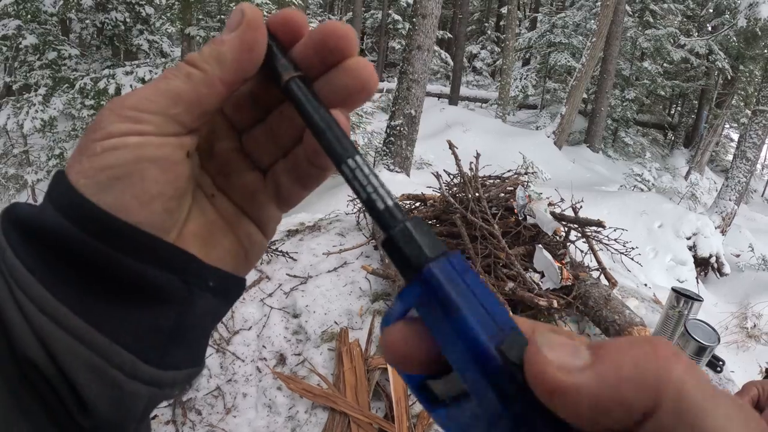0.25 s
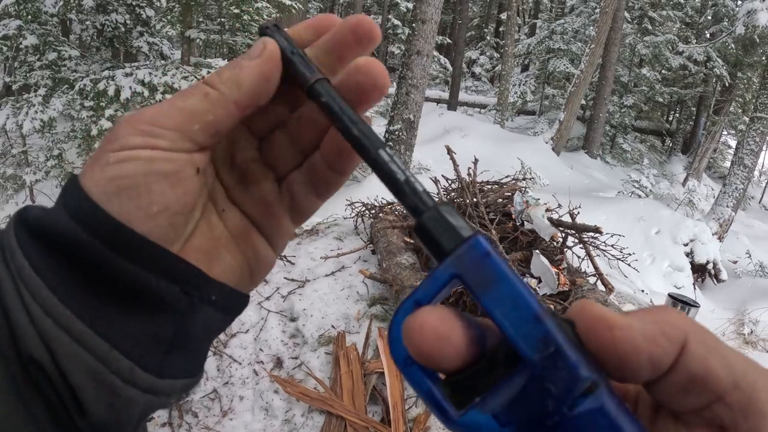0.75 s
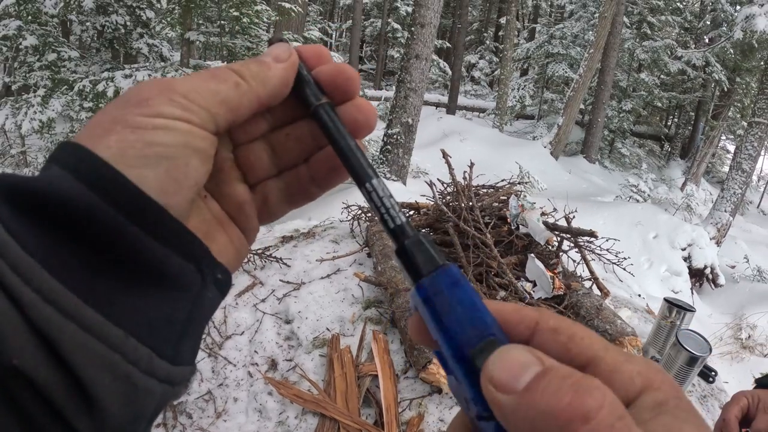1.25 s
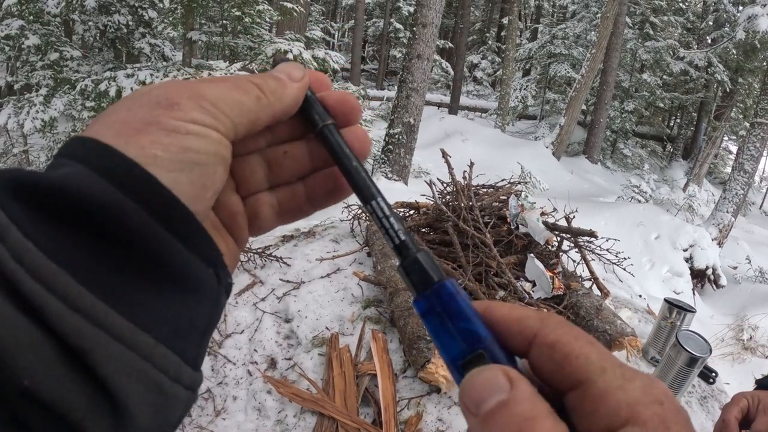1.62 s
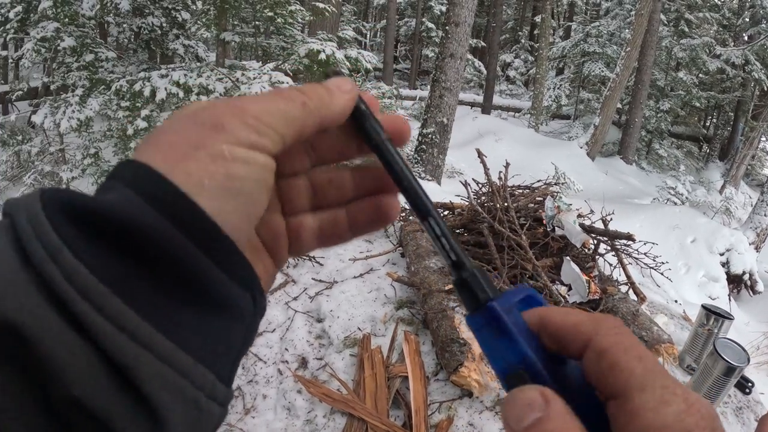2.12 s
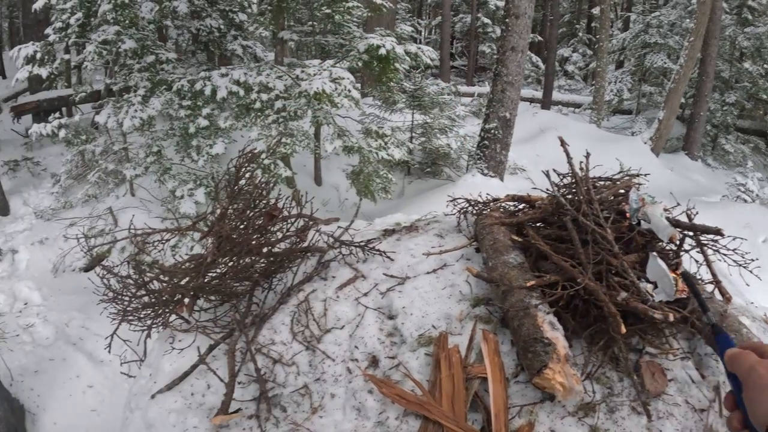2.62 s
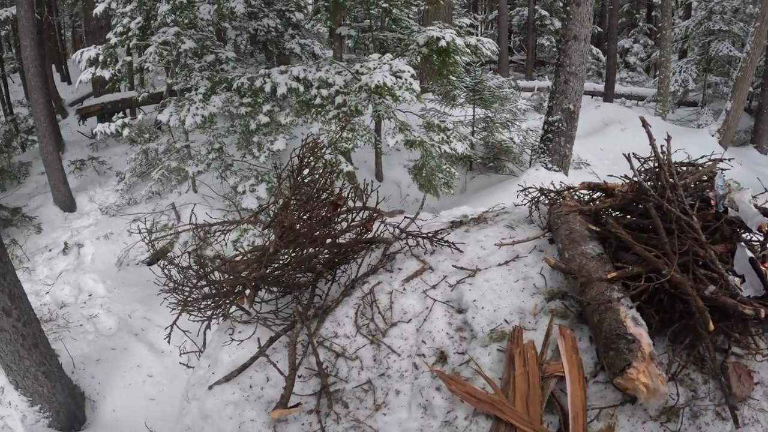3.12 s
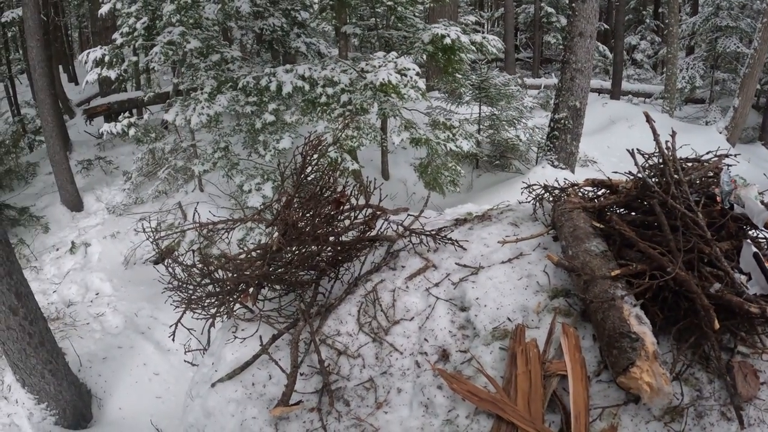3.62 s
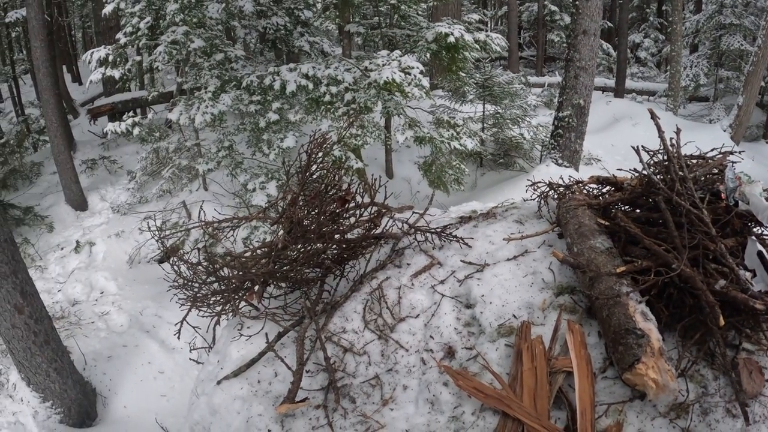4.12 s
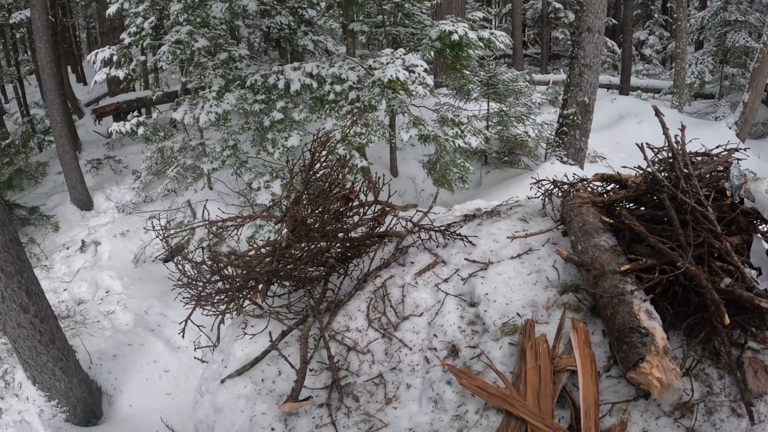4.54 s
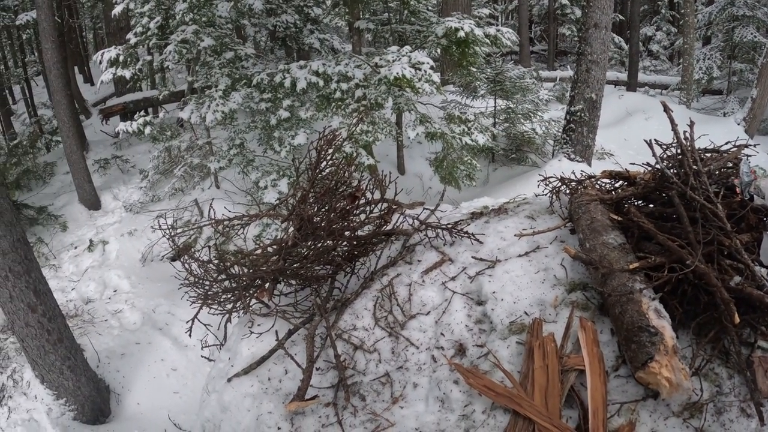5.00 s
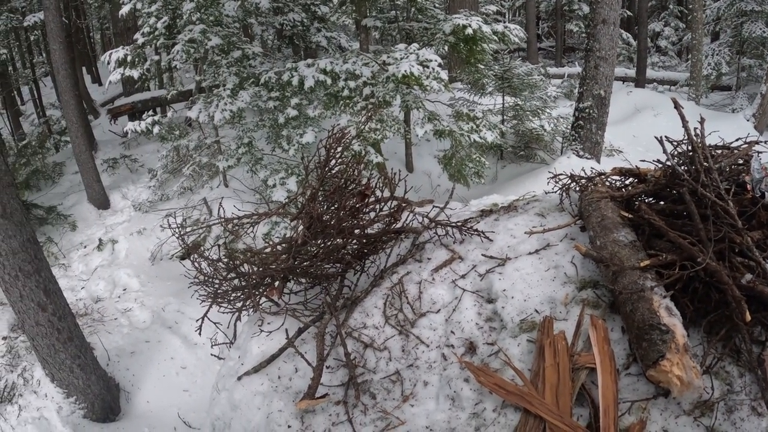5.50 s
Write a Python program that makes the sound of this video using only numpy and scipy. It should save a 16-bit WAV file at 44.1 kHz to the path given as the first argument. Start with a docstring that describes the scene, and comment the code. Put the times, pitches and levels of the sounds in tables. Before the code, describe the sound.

A utility lighter's lever ticks back and forth, cloth swishes as the arm moves, then its trigger is pumped repeatedly with hard igniter snaps.

```python
"""A long-necked plastic gas lighter is worked close to a microphone in a quiet snowy wood.
First its notched flame lever is run to and fro; after the arm has moved, the trigger is pumped:
small catches, then the igniter's hammer snaps and the metal neck rings. Each click is a burst of
noise driven through dying sines. Sleeves rustle and the wood hums faintly as shaped noise."""
import sys
import numpy as np
from scipy import signal
from scipy.fft import rfft, irfft
from scipy.io import wavfile
from scipy.ndimage import uniform_filter1d

SR = 44100
rng = np.random.default_rng(int(sys.argv[2]) if len(sys.argv) > 2 else 0)


def inscribe(sig):
    """Save sig as 16-bit PCM at rate SR to the path in sys.argv[1].

    A 1-D sig is mono; a 2-D sig holds one channel per row.
    Samples are clipped to [-1, 1] before scaling.
    """
    pcm = np.round(np.clip(np.atleast_2d(sig).T, -1, 1) * 32767)
    wavfile.write(sys.argv[1], SR, pcm.astype(np.int16))


N = 254104

# Flame lever jumping its notches. Each row: time in s, peak in dB, favoured low ring in Hz, favoured
# high ring in Hz, high ring level in dB, hardness in dB per octave, slip length in ms, body ring in dB.
NOTCHES = [(0.022, -7, 2080, 2670, -21.5, -5, 1.54, -8.5), (0.07, -15, 2020, 3540, 0, -15, 1.85, -8),
           (0.092, -21, 1870, 3230, -11.5, -24, 0.5, -12),
           (0.242, -4.5, 1920, 3300, 0.5, -10.5, 2.24, -8.5), (0.268, -3, 2020, 3350, 1.1, -16, 1.44, -6.5),
           (0.291, -6, 2000, 3645, -6.2, -11, 2, -6.5), (0.316, -3.5, 1980, 3260, -3.5, -12, 1.19, -10.5),
           (0.354, -3.5, 1950, 3320, -5, -12, 1.73, -7.5), (1.01, 2, 2090, 2900, 5.5, -6, 1.5, -9.5),
           (1.053, -3, 2030, 3050, 4, -9, 1.96, -8), (1.073, -18.5, 2390, 2990, -0.5, 0, 1.4, -37),
           (1.115, 0.5, 1830, 2580, 5, -3, 1.16, -8.5), (1.268, -1.5, 2240, 2810, -1.5, -6.5, 2.05, -11.5),
           (1.493, -2.5, 2250, 2750, 12.5, -1, 1.45, -4), (1.524, -4.5, 2170, 3550, -11, -0.5, 1.13, 1.7),
           (1.59, -3, 2230, 3570, 2, 4, 1.34, -0.5), (1.888, -1, 2060, 3390, 4.5, 3, 1.37, 1),
           (1.923, -0.5, 2220, 2600, 0.5, 8.5, 1.54, 0)]
# Trigger catching on its way to the snap. Each row: time in s, peak in dB, favoured low ring in Hz,
# favoured high ring in Hz, high ring level in dB, hardness in dB per octave.
CATCHES = [(3.295, -2.5, 2600, 3650, 16.5, 10.5), (3.325, -4.5, 1580, 3830, 10, 7),
           (3.518, -26.5, 1920, 4820, -9, -12), (3.523, -13, 1880, 4570, 6, 3),
           (3.809, -15.5, 2320, 3300, 2, 4), (3.812, -10.5, 1630, 2770, -3, 6.5),
           (3.87, -6.5, 2600, 3900, 0.5, 2), (4.155, -10.5, 1620, 2920, .1, 0),
           (4.196, -16, 2450, 2560, 4, -3.5), (4.202, -17.5, 1520, 3220, -6, -11),
           (4.475, -13, 1480, 2750, -4, -0.2), (4.519, -22, 1570, 3500, -12, -12.5),
           (4.71, -11.5, 1930, 4200, -4, 7), (4.759, -18, 1570, 2480, -14, -18.5),
           (4.954, -22.5, 1540, 2740, -7, -13.5)]
# Igniter hammer. Each row: time in s, crack peak in dB, hardness in dB per octave,
# neck ring gain in dB relative to the snap.
SNAPS = [(3.556, 2.6, 14.5, -24), (3.908, 0.2, 9.5, -22), (4.237, -1.1, 9, -19), (4.556, 0.2, 11.5, -16.5),
         (4.799, 0.06, 11.5, -15), (5.016, 0.5, 12, -14)]


def gain_of(db):
    """Amplitude factor of a level in dB."""
    return 10 ** (np.asarray(db) / 20)


def evened(x):
    """Scaled to unit RMS."""
    return x / np.sqrt(np.mean(x ** 2) + 1e-20)


def peaked(x):
    """Scaled to unit peak."""
    return x / (abs(x).max() + 1e-12)


def read(points, hz):
    """A curve of (Hz, value) points read on a log frequency axis."""
    f, value = np.transpose(points)
    return np.interp(np.log(hz + 1), np.log(f + 1), value)


def add(mix, s, sound):
    """Adds a sound into the mix at s seconds, cut at the end."""
    part = mix[round(s * SR):][:len(sound)]
    part += sound[:len(part)]


def ring(modes, tilt_db, size):
    """Dying sines; a harder blow, with more tilt in dB per octave, favours the high ones."""
    hz, db, t60 = np.transpose(modes)[:, :, None]
    t = np.arange(size) / SR
    level_db = db + tilt_db * np.log2(hz / 2000) - 60 * t / t60
    return (gain_of(level_db) * np.sin(2 * np.pi * hz * t)).sum(0)


def causal(points, size):
    """Minimum-phase filter with the given gain: it answers only after the blow."""
    log_gain = read(points, abs(np.fft.fftfreq(size, 1 / SR))) * np.log(10) / 20
    spectrum = np.exp(np.conj(signal.hilbert(log_gain)))
    return np.fft.ifft(spectrum).real[:size // 2]


def noise(points, patchy_db, flicker_db, size):
    """Random short-time spectra with drifting patches and flicker shared by all bands."""
    hop = size // 4
    frames, hz = N // hop + 5, np.fft.rfftfreq(size, 1 / SR)
    a, b, patches = rng.standard_normal((frames, len(hz), 3)).T
    patches = uniform_filter1d(patches, size=6, axis=0)
    patches = evened(uniform_filter1d(patches, size=10, axis=1))
    flicker = evened(uniform_filter1d(rng.standard_normal(frames), size=4))
    level_db = read(points, hz)[:, None] + patchy_db * patches + flicker_db * flicker
    z = (a + 1j * b) * gain_of(level_db)
    return evened(signal.istft(z, nperseg=size, noverlap=size - hop)[1][:N])


def slip(length_ms, grit, tail_db):
    """A tooth lets go in a short noise burst; hands and snow return a weak smear."""
    ms = np.arange(len(grit)) / SR * 1000
    u = ms / np.clip(length_ms, .2, 6)
    smear = gain_of(tail_db - 1.6 * ms) * (1 - np.exp(-u ** 2)) * np.sqrt(1 - ms / ms[-1])
    shape = u ** 2 * np.exp(1 - u ** 1.56) + smear
    # even out the noise burst's spectrum so its colour stays steady, then restore its shape
    z = rfft(grit * shape)
    even = irfft(z / uniform_filter1d(abs(z), size=5), len(grit))
    return even / np.sqrt(uniform_filter1d(even ** 2, size=31) + 1e-12) * shape


def band(x, lo_hz, hi_hz):
    """Third-order Butterworth band-pass, run forward in time."""
    sos = signal.butter(3, [lo_hz, hi_hz], "bandpass", fs=SR, output="sos")
    return signal.sosfilt(sos, x)


def stillness():
    """The quiet wood: faint steady noise with a shaped spectrum."""
    # Each row: frequency in Hz, relative density in dB per Hz.
    still_spectrum = [(12, -70.5), (20, -46.5), (94, -66.5), (135, -11), (270, -4), (310, -3), (421, -13),
                      (457, -13.5), (603, 2), (865, -21), (1110, -10), (1210, -3.5), (15000, -55)]
    level_db = -61.5
    return gain_of(level_db) * noise(still_spectrum, patchy_db=1.1, flicker_db=0.8, size=1024)


def click_swell():
    """Soft rounded swell of background noise around each louder click; overlaps add as power."""
    rise_s, fall_s = 0.059, 0.12
    t = np.arange(0, N, 64) / SR
    s, db = np.transpose([row[:2] for row in NOTCHES + CATCHES + SNAPS])[:, :, None]
    width_s = np.where(t < s, rise_s, fall_s)
    bumps = gain_of(db / 2) * np.exp(-((t - s) / width_s) ** 2)
    total = np.sqrt((bumps ** 2).sum(0))
    return np.interp(np.arange(N) / SR, t, total)


def rustle():
    """Cloth swishes in the treble and rumbles in the bass; moved air pushes on the microphone."""
    # Arm and sleeve movement. Each row: time in s, swish level in dB, rumble level in dB.
    moving = [(0.0, -48.5, -50.5), (0.43, -46.5, -47.5), (0.56, -52, -55), (0.82, -57, -57.5),
              (1.14, -51.5, -51), (1.38, -80, -64), (1.62, -63, -55.5), (1.771, -66, -58),
              (2.05, -67, -60.5), (2.21, -44.5, -51), (2.34, -44, -43), (2.42, -45, -42.5),
              (2.68, -43.5, -41), (3.07, -47.5, -44.5), (3.31, -61.5, -52), (3.75, -64, -66),
              (4.45, -66, -63), (4.9, -57.5, -65), (5.22, -66.5, -57), (5.441, -69.5, -59),
              (5.6, -56.5, -57.5), (5.76, -39, -48.5)]
    # Spectra of swish, rumble and moved air. Each row: frequency in Hz, relative density in dB per Hz.
    swish_spectrum = [(350, -31), (600, -2.5), (815, -8), (895, -28), (1120, 1), (1610, -1.5), (1940, 1.5),
                      (2240, 0.5), (4370, -4), (7060, -12.5), (9340, -29), (11600, -18.5), (14500, -54.5)]
    rumble_spectrum = [(65, -44.5), (110, -22.5), (150, 1), (284, 5.5), (446, 7.5), (561, 2), (620, 2),
                       (1200, -4), (1560, -38.5), (2640, -120)]
    deep_spectrum = [(15, -24), (30, -12.5), (65, -3), (95, -7), (130, -40.5), (400, -81.5)]
    swell_treble_db, swell_bass_db, air_under_rumble_db = -51.5, -54.5, -36.5

    t, swell = np.arange(N) / SR, click_swell()
    s, swish_points_db, rumble_points_db = np.transpose(moving)
    swish_db = np.interp(t, s, swish_points_db)
    rumble_db = np.interp(t, s, rumble_points_db)
    # movement and swell add as power
    swish_gain = np.hypot(gain_of(swish_db), gain_of(swell_treble_db) * swell)
    rumble_gain = np.hypot(gain_of(rumble_db), gain_of(swell_bass_db) * swell)
    air_gain = gain_of(rumble_db + air_under_rumble_db)

    rumble = rumble_gain * noise(rumble_spectrum, patchy_db=2.0, flicker_db=1.5, size=1024)
    swish = swish_gain * noise(swish_spectrum, patchy_db=2.2, flicker_db=0.82, size=256)
    deep = air_gain * noise(deep_spectrum, patchy_db=1.5, flicker_db=2.5, size=2048)
    return swish + rumble + deep


def rubs():
    """Faint rubs: uneven noise in one narrow resonance."""
    # Each row: start in s, end in s, centre in Hz, width in Hz, level before the fades in dB.
    rub_rows = [(0.739, 0.868, 2070, 506, -51.5), (2.742, 3.005, 1620, 250, -48)]
    out = np.zeros(N)
    for start_s, end_s, hz, width_hz, db in rub_rows:
        size = round((end_s - start_s) * SR)
        hiss, drift = rng.standard_normal((2, size))
        grain = gain_of(3.3 * evened(uniform_filter1d(drift, size=300)))
        rub = evened(band(hiss * grain, hz - width_hz / 2, hz + width_hz / 2))
        add(out, start_s, gain_of(db) * rub * signal.windows.tukey(size, 0.4))
    return out


def thuds():
    """Arm and jacket knock dully near the microphone: short low sines, then a band-pass."""
    # Each row: time in s, peak before the band-pass in dB, pitch in Hz, decay constant in ms.
    thud_rows = [(2.42, -25.5, 318, 3.5), (2.523, -27, 316, 0.97), (2.541, -26.5, 410, 2.2),
                 (2.564, -27, 372, 2), (2.59, -29, 444, 2.2), (2.655, -29.5, 493, 1.6),
                 (2.672, -24, 277, 2.2), (2.727, -26.5, 400, 1.6), (2.910, -12.5, 500, 0.58),
                 (4.805, -28, 156.6, 3.3)]
    out, t = np.zeros(N), np.arange(1500) / SR
    for s, db, hz, length_ms in thud_rows:
        u = t * 1000 / np.clip(length_ms, .3, 5)
        knock = np.sin(2 * np.pi * hz * t) * np.sqrt(u) * np.exp(-u)
        add(out, s, gain_of(db) * peaked(knock))
    return band(out, 138, 2700)


def near_echo(x):
    """Hands, jacket and brushwood scatter each click back as a short dull tail."""
    level_db, t60_s, build_s = -33.0, 0.14, 0.00073
    t = np.arange(6000) / SR
    envelope = gain_of(-60 * t / t60_s) * (1 - np.exp(-t / build_s))
    tail = band(rng.standard_normal(len(t)), 980, 10000) * envelope
    return gain_of(level_db) * signal.oaconvolve(x, tail / np.linalg.norm(tail))[:N]


def shell(hard_db, body_db, top_db):
    """Ring of the whole lighter for one blow; so small a thing sends out little below its lowest ring."""
    # Plastic walls, tank and tooth edges. Each row: frequency in Hz, relative level in dB, t60 in s.
    wall_modes = [(1560, -26.5, 0.024), (2040, -3.5, 0.011), (2875, 5, 0.0035), (3890, 5, 0.0018),
                  (4870, -1.5, 0.0035), (6664, -9.5, 0.0037), (7700, -59, 0.0017)]
    tank_modes = [(810, 0, .016)]
    edge_modes = [(10390, 6, 0.0007), (11280, 2.5, .004), (11800, -7.5, 0.001), (15270, -19.5, .003)]
    walls = band(band(ring(wall_modes, hard_db, size=900), 1150, 8100), 938, 9000)
    tank = band(ring(tank_modes, 0, size=900), 680, 1600)
    edges = band(ring(edge_modes, 0, size=900), 5500, 22000)
    return walls + gain_of(body_db) * tank + gain_of(top_db) * edges


def click(db, low_hz, high_hz, high_db, hard_db, length_ms, body_db, grit):
    """One slip rings the shell; the grip lets two rings stand out."""
    grip_db, grip_t60_s = 7, 0.006
    favoured = ring([(low_hz, 0, grip_t60_s), (high_hz, high_db, grip_t60_s)], 0, size=900)
    # tooth edges: level at rest, then dB gained per dB of hardness and of body
    edge_db = -13 + 0.9 * hard_db + 0.2 * body_db
    rings = shell(hard_db, body_db, edge_db) + gain_of(grip_db) * band(favoured, 1274, 7500)
    return gain_of(db) * peaked(signal.fftconvolve(slip(length_ms, grit, tail_db=-7.0), rings))


def clicks():
    """Lever notches, trigger catches and shell ticks, each with a low jolt of the hand."""
    # Plastic ticks as the fingers shift. Each row: time in s, peak in dB, favoured low ring in Hz.
    ticks = [(.036, -25.5, 3910), (.045, -30, 4010), (.058, -25, 1840), (.18, -35, 4900),
             (.234, -24.5, 1830), (0.497, -31.5, 1750), (.625, -34, 4870), (0.761, -34, 1950),
             (.794, -34.5, 1880), (.844, -35.5, 3780), (.882, -32.5, 4970), (.92, -37.5, 3400),
             (1.042, -20.5, 2300), (1.135, -31.5, 2500), (1.246, -28.5, 3010), (1.478, -22, 2900),
             (1.864, -32, 3100), (2.17, -25.5, 2240), (2.18, -30, 2200), (2.336, -24, 1370),
             (2.345, -22, 3320), (2.408, -31, 3630), (2.431, -27, 1410), (2.451, -29, 3830),
             (3.047, -21, 2530), (3.061, -27, 4580), (3.245, -26, 2030), (3.307, -28.5, 3440),
             (3.35, -27.5, 3800), (3.42, -34, 1950), (3.457, -37.5, 2220), (3.502, -29, 3700),
             (3.51, -21.5, 2480), (3.789, -41, 1570), (4.002, -37, 5500), (4.127, -29.5, 1560),
             (4.164, -24.5, 4010), (4.436, -44, 4800), (4.442, -31.5, 4020), (4.51, -24.5, 2700),
             (4.681, -35.5, 1560), (4.745, -25, 2550), (4.922, -39, 1550), (4.972, -40, 1560)]
    catch_slip_ms, catch_body_db = 1.4, -22
    tick_high_hz, tick_spread, tick_high_db = 3280, 0.12, -4  # spread: scatter of the high ring, as a share
    tick_hard_db, tick_slip_ms, tick_body_db = -7.5, 1.27, -14.5

    out, t = np.zeros(N), np.arange(1500) / SR
    jolt = band(gain_of(-13.0 - 60 * t / 0.0078) * np.sin(2 * np.pi * 260 * t), 180, 500)
    rows = NOTCHES + [(*row, catch_slip_ms, catch_body_db) for row in CATCHES]
    scatter = 1 + tick_spread * rng.uniform(-1, 1, len(ticks))
    for (s, db, hz), share in zip(ticks, scatter):
        rows = rows + [(s, db, hz, tick_high_hz * share, tick_high_db,
                        tick_hard_db, tick_slip_ms, tick_body_db)]
    for row, grit in zip(rows, rng.standard_normal((len(rows), 900))):
        s, db, body_db = row[0], row[1], row[-1]
        add(out, s - 0.001, click(*row[1:], grit))
        add(out, s, gain_of(db + body_db) * jolt)
    return out


def snaps():
    """The hammer cracks in the shell, sets the neck ringing, rattles back, and a hiss dies away."""
    # Metal neck, then rings favoured under the trigger grip.
    # Each row: frequency in Hz, relative level in dB, t60 in s (the neck's before extra damping).
    neck_modes = [(1867, 2, 0.027), (2150, -8, 0.049), (2570, -22.5, 0.033), (3273, -4, 0.13),
                  (4270, -20, .04), (6200, -20, 0.074)]
    grip_modes = [(2020, 14, 0.0043), (2626, 15, 0.0045), (3980, 7, 0.011), (4700, 5.5, 0.0069)]
    # Spring and gas after a snap. Each row: frequency in Hz, relative density in dB per Hz.
    hiss_spectrum = [(530, -37.5), (900, -15.5), (1860, 9.5), (3080, 4.5), (3330, -18.5), (3610, -21.5),
                     (4340, 7.5), (8950, -16), (11300, -18.5), (14000, -49.5)]
    neck_build_s, neck_damp_db_per_s = 0.000097, 130
    push_db, hiss_db, hiss_t60_s = -30, -37, 0.23

    out, hiss_gain, t = np.zeros(N), np.zeros(N), np.arange(9000) / SR
    neck = ring(neck_modes, 0, size=len(t))
    neck = neck * (1 - np.exp(-t / neck_build_s)) * gain_of(-neck_damp_db_per_s * t)
    push = band(np.sin(2 * np.pi * 170 * t) * gain_of(-60 * t / 0.013), 160, 750)
    grip = band(ring(grip_modes, 0, size=900), 1000, 8000)
    for (s, db, hard_db, neck_db), grit in zip(SNAPS, rng.standard_normal((len(SNAPS), 900))):
        rings = shell(hard_db, body_db=-33.5, top_db=8.2) + grip
        crack = peaked(signal.fftconvolve(slip(1.37, grit, tail_db=-13.5), rings))
        add(out, s - 0.001, gain_of(db) * crack)
        add(out, s, gain_of(db) * (gain_of(neck_db) * neck + gain_of(push_db) * push))
        add(hiss_gain, s, gain_of(db + hiss_db - 60 * t / hiss_t60_s))
        for late_s, late_db in [(0.015, -26), (0.036, -31)]:  # rattles
            add(out, s + late_s, gain_of(db + late_db) * band(crack, 1700, 5500))
    return out + hiss_gain * noise(hiss_spectrum, patchy_db=2.0, flicker_db=1.5, size=256)


def scene():
    """Lighter, its near echo, handling and the wood, the same on both channels."""
    lighter = clicks() + snaps()
    handling = thuds() + rubs() + rustle()
    air = lighter + near_echo(lighter) + handling + stillness()
    return np.array([air, air])


def record(dry):
    """Rounds the tallest peaks, colours by the housing, parts the two ports, limits the band."""
    # Housing with a narrow treble notch. Each row: frequency in Hz, gain in dB.
    housing = [(8400, -2), (8800, -2.5), (9000, -14), (9200, -4), (9600, 1), (13200, -7), (14000, -13),
               (16500, -27.5)]
    # Side signal against mid. Each row: frequency in Hz, gain in dB.
    side_gain = [(25, -15), (120, -39), (1000, -44), (3000, -42), (6000, -35), (9000, -23), (13000, -7)]
    edge_hz = 16500
    rounded = np.tanh(0.8 * dry) / 0.8
    mid = signal.oaconvolve(rounded, causal(housing, size=4096)[None], axes=1)[:, :N]
    # 1j: a quarter cycle between side and mid
    side_db = read(side_gain, np.fft.rfftfreq(N, 1 / SR))
    side = irfft(1j * rfft(mid[0]) * gain_of(side_db), N)
    both = mid + np.array([side, -side])
    low_pass = signal.firwin(1023, edge_hz, window=("kaiser", 12), fs=SR)
    return signal.oaconvolve(both, low_pass[None], "same")


dry = scene()
out = record(dry)
inscribe(out)
```